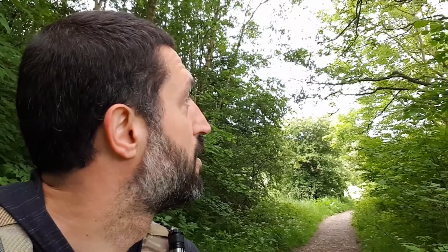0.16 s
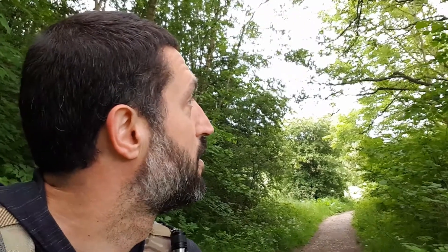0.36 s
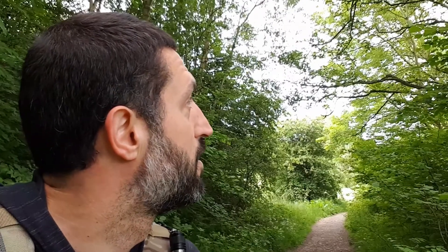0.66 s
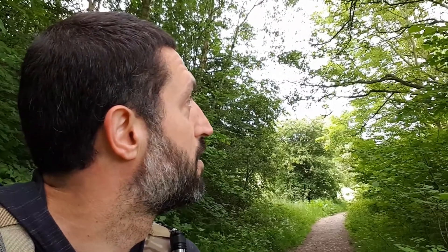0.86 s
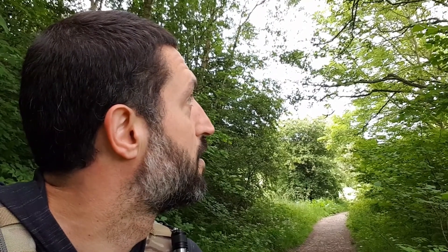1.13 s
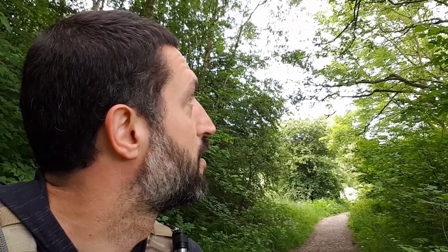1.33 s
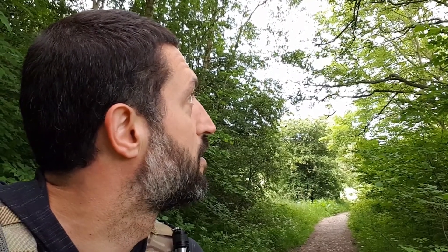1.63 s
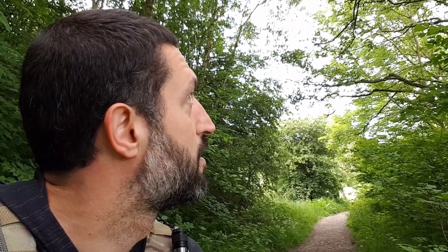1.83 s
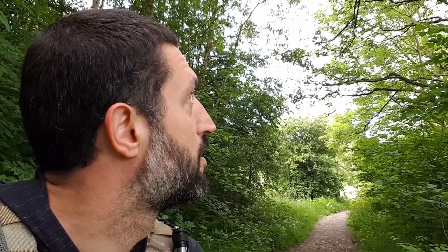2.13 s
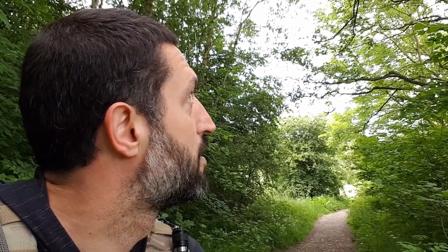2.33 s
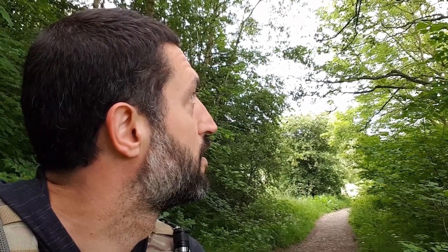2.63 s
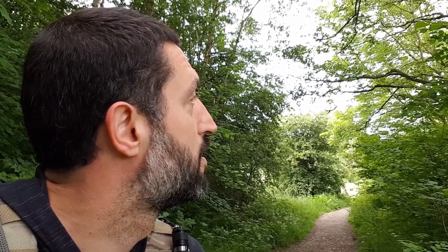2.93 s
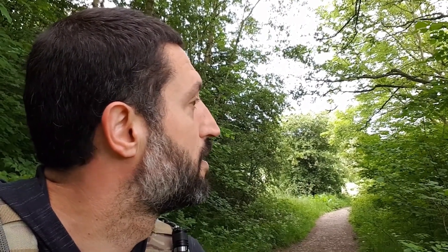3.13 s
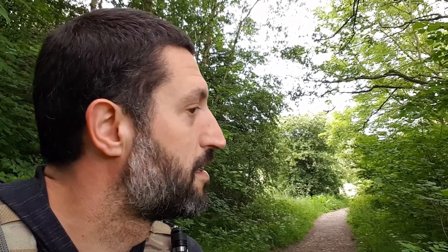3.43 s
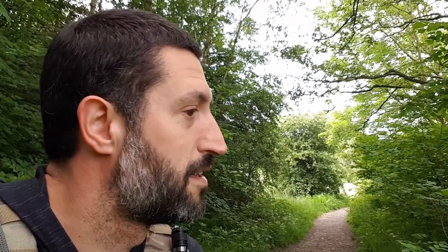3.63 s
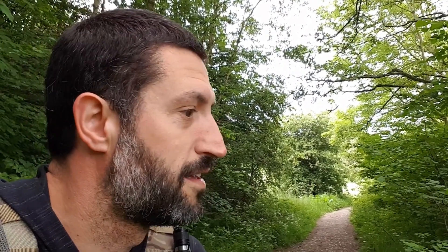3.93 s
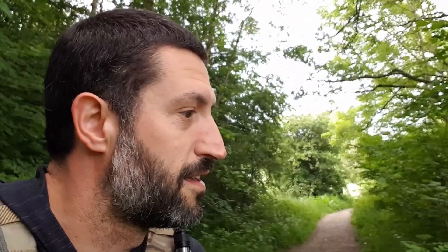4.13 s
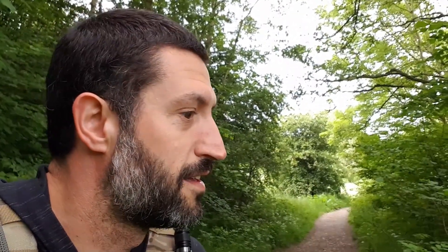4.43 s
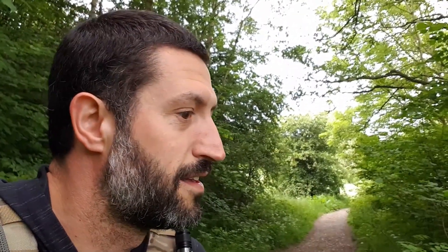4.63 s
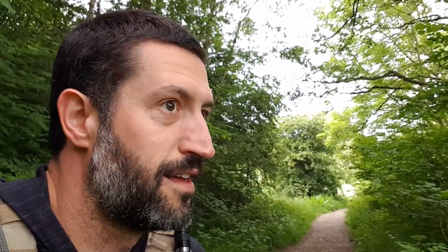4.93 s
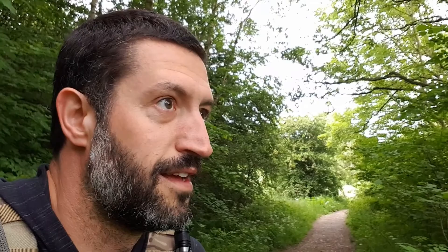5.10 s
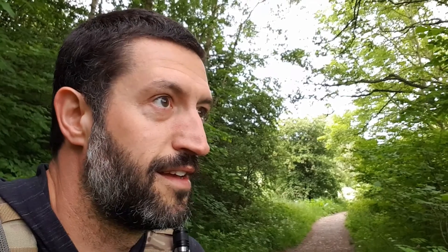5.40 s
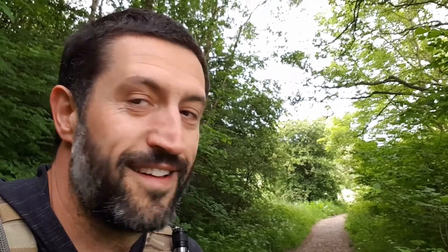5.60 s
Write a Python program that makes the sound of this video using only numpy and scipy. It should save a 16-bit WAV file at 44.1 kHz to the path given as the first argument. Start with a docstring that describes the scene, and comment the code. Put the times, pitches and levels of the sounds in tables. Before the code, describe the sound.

A lively woodland bird chorus fills about six seconds, already under way at the start. Short clear whistles and fast chirps overlap, and a mellow winding warble comes around 0.6 to 0.85 s. After a slightly sparser moment near 1 s, with faint ticks, sharp high chirps return at 1.25 to 1.5 s. From 2 to 2.9 s the singing is dense, with rapid up and down sweeps and a lower wavering whistle. Thin, slightly buzzy high notes twitter at about 3.2 to 3.5 s, followed by strong bright falling notes at 3.7 to 3.95 s. More quick chirps cluster around 4.5, 5.05 and 5.45 s, and thin high notes return near 5.6 s. Distant twitters and soft woodland echoes fill the gaps. A steady hiss of leaves and far traffic continues beneath, easing slightly at the end. The stereo is wide, with birds mostly left.

```python
"""Woodland birdsong over a far rush

Birds sing short whistles, fast sweeps and winding notes: sines on pitch curves, smeared by noise-tail echoes.
A bent waveform adds overtones. Far traffic and leaves are filtered noise; faint ticks and low blips lie on top.
Two microphones apart hear it: above the low bass the left one is earlier, and it gets the brighter sound.
"""
import sys
import numpy as np
from scipy import signal
from scipy.fft import rfft, irfft, next_fast_len
from scipy.io import wavfile
from scipy.ndimage import uniform_filter1d, map_coordinates

SR = 44100
rng = np.random.default_rng(int(sys.argv[2]) if len(sys.argv) > 2 else 0)


def to_wav(s):
    """Save 16-bit WAV."""
    ch = np.atleast_2d(s).T  # columns
    pcm = np.round(np.clip(ch, -1, 1) * 32767)  # PCM
    wavfile.write(sys.argv[1], SR, pcm.astype(np.int16))


N = 254016


def amp(db):
    """dB to linear gain."""
    return 10 ** (np.asarray(db) / 20)


def unit(x):
    """Scale to RMS 1."""
    return x / np.sqrt(np.mean(x ** 2) + 1e-20)


def along(points, hz):
    """Interpolate (f/Hz, value) points on a log frequency axis."""
    f, v = np.transpose(points)
    return np.interp(np.log(hz + 1), np.log(f + 1), v)


def wobble(rate_hz, size):
    """Smooth random curve, rate_hz knots a second."""
    knots = rng.standard_normal(int(size * rate_hz / SR) + 4)
    return map_coordinates(knots, [np.arange(size) * rate_hz / SR])


def filtered(x, response):
    """Multiply the spectrum of x by a complex response of frequency."""
    m = next_fast_len(N + SR // 2)
    return irfft(rfft(x, m) * response(np.fft.rfftfreq(m, 1 / SR)), m)[..., :N]


# Rush spectrum, relative density: f/Hz, level/dB
RUSH_SPECTRUM = [(15, -40.5), (30, -15), (55, 0.5), (100, -1), (220, -19.5), (400, -12.5), (630, -2),
                 (950, 0), (1400, 0), (2200, 0), (3400, -7.5), (7000, -11), (8500, -20.5), (12700, -13.5),
                 (15800, -32)]
# Rush level before RUSH_GAIN_DB: t/s, level/dB
RUSH_LEVEL = [(0.0, -50.5), (0.35, -50.5), (5.42, -50.5), (5.76, -52.5)]
# Likeness of the two microphones: f/Hz, correlation [-]
RUSH_LIKENESS = [(60, .85), (200, 0.547), (800, 0.633), (1500, 0.785), (2300, 0.688), (3500, 0.098),
                 (15000, 0.13)]
# Left-right balance: f/Hz, level difference/dB
RUSH_BALANCE = [(60, 4), (110, 2), (200, 3.0), (380, 7.5), (700, 5), (1290, -3), (2380, -1), (4400, 7),
                (8120, 8.5), (15000, 15.5)]
RUSH_GAIN_DB = 10.0


def rush(patchy_db):
    """Far traffic and leaves: noise with faint time-frequency patches, shared by the microphones per band."""
    z = signal.stft(rng.standard_normal((2, N + 512)), nperseg=512)[2]
    field = rng.standard_normal(z.shape[1:])
    field = uniform_filter1d(field, 6, axis=0)
    field = uniform_filter1d(field, 14, axis=1)
    pair = signal.istft(z * amp(patchy_db * unit(field)), nperseg=512)[1][:, :N]

    def mid_side(hz):
        turn = np.arccos(np.clip(along(RUSH_LIKENESS, hz), -1, 1)) / 2
        return amp(along(RUSH_SPECTRUM, hz)) * [np.cos(turn), np.sin(turn)]

    mid, side = filtered(pair, mid_side)
    both = np.array([mid + side, mid - side])
    both = filtered(both, lambda hz: amp(along(RUSH_BALANCE, hz) * [[.5], [-.5]]))
    t_s, db = np.transpose(RUSH_LEVEL)
    return amp(np.interp(np.arange(N) / SR, t_s, db) + RUSH_GAIN_DB) * unit(both)


WHISTLE_IN_DB, WHISTLE_ECHO_DB, WHISTLE_WAVER_PCT = -5, -2, 0.968  # start re peak, echo, base waver
DROP_DB, DROP_S, FADE_DB_PER_S = -6, 0.026, -93


def held(s, rise, length, first, top, last, db, lean, waver_pct):
    """A whistle rises to its peak, drops quickly while it fades, then only fades."""
    rest = max(length - rise, .004)
    after = np.array([0, min(DROP_S, rest / 2), rest])
    level = db + DROP_DB * np.minimum(after / DROP_S, 1) + FADE_DB_PER_S * after
    hz = top + (last - top) * after / rest
    rows = np.transpose([s + rise + after, hz, level])
    return lean, WHISTLE_ECHO_DB, waver_pct, [(s, first, db + WHISTLE_IN_DB), *rows]


# Held whistles: start t/s, rise/s, length/s, first f/Hz, peak f/Hz, last f/Hz,
# peak level/dB before mixing, direct left-right/dB
WHISTLE_NOTES = [(0, 0.0265, 0.056, 4910, 5040, 5390, -41.5, 9),
                 (0.094, 0.0127, 0.1, 4826, 5036, 4983, -32.5, 12.5),
                 (0.122, 0.0227, 0.107, 3867, 4245, 4195, -31, 11.5),
                 (0.288, 0.0533, 0.15, 5995, 6596, 6580, -34, 15.5),
                 (.32, 0.0284, 0.089, 4100, 4550, 4520, -41.5, 9),
                 (0.353, 0.0093, 0.046, 3336, 3290, 3320, -45.5, 7.5),
                 (0.569, 0.0095, 0.083, 4494, 4400, 4370, -43.5, 8),
                 (.76, 0.0337, 0.0405, 3340, 3242, 3170, -42, 3.5),
                 (0.888, 0.0249, 0.061, 2518, 2228, 2174, -37.5, -1.5),
                 (1.15, .03, 0.068, 4210, 4070, 4200, -61, 14),
                 (1.269, 0.0067, 0.05, 5850, 5710, 6005, -38.5, 18.5),
                 (1.284, 0.024, 0.07, 4430, 4422, 4400, -42, 8.5),
                 (1.378, 0.0326, 0.0285, 6047, 6190, 6450, -40.5, 14),
                 (1.39, .025, 0.0294, 4490, 4950, 5070, -45.5, 12.5),
                 (1.435, 0.0125, 0.05, 5137, 5212, 5460, -37, 13.5),
                 (1.71, 0.0335, 0.112, 4840, 4930, 4900, -36, 15.5),
                 (1.884, 0.0132, .065, 4736, 5013, 4930, -37.5, 13),
                 (1.881, 0.0254, 0.054, 3756, 3830, 3922, -39.5, 7),
                 (2.042, 0.0204, 0.0458, 5600, 5010, 4894, -31.5, 15),
                 (2.223, 0.042, 0.107, 7203, 6820, 6850, -42.5, 17.5),
                 (2.352, 0.023, 0.077, 6980, 7124, 7282, -38.5, 13),
                 (2.515, .04, 0.099, 4454, 4690, 4650, -48, 18),
                 (2.545, .008, 0.036, 5470, 5350, 5370, -40, 15.5),
                 (2.627, 0.0221, 0.067, 5620, 5347, 5340, -41.5, 18.5),
                 (2.771, 0.0294, 0.054, 4890, 4695, 4660, -48, 11.5),
                 (2.857, .035, 0.123, 2750, 3047, 3055, -40.5, 6),
                 (3.023, 0.0226, 0.073, 4560, 4670, 5010, -46, 13.5),
                 (3.31, 0.0197, 0.042, 3867, 3830, 3780, -49.5, 6),
                 (3.395, 0.0103, 0.0685, 5697, 5628, 5414, -32, 22.5),
                 (3.403, 0.0087, 0.048, 4300, 4452, 4615, -42.5, 6.5),
                 (3.515, 0.033, 0.133, 2408, 2365, 2490, -42, 0.5),
                 (3.534, 0.0183, 0.094, 4860, 5100, 5050, -43, 15),
                 (3.96, 0.0106, 0.138, 3768, 3843, 3800, -34.5, 4.5),
                 (4.355, 0.0393, 0.0766, 3340, 3050, 3410, -45, 10.5),
                 (4.465, 0.0115, 0.032, 5805, 5830, 5880, -40.5, 16.5),
                 (4.51, 0.022, 0.047, 6550, 6535, 6590, -44.5, 14.5),
                 (4.618, 0.04, 0.096, 2900, 3393, 2890, -46, 14),
                 (4.729, 0.0097, 0.043, 4322, 4320, 4325, -43.5, 4),
                 (4.812, 0.0366, .06, 3440, 3314, 2988, -48.5, 11.5),
                 (4.82, 0.0503, 0.08, 2210, 2068, 2166, -46, -8.5),
                 (4.95, 0.022, 0.042, 3430, 3500, 3470, -52, 4.5),
                 (5.015, 0.0212, 0.042, 4200, 4350, 4153, -39, 9.5),
                 (5.04, 0.0079, 0.049, 5027, 5044, 4910, -35.5, 17),
                 (5.063, 0.011, 0.065, 3540, 3600, 3647, -37.5, 7.5),
                 (5.318, 0.0144, 0.0356, 3604, 3560, 3558, -47, 5),
                 (5.4, 0.022, 0.03, 4825, 4920, 5050, -46.5, 13.5),
                 (5.478, 0.0172, 0.041, 4148, 4770, 4783, -36.5, 9),
                 (5.481, 0.0102, 0.063, 5140, 5764, 5895, -31, 19),
                 (5.723, 0.0178, 0.0375, 2565, 2682, 2687, -38, -2.5)]


def whistles():
    """Held whistles near by: rise, quick drop, slow fade."""
    return [held(*row, WHISTLE_WAVER_PCT) for row in WHISTLE_NOTES]


SWEEP_PEAK = 0.43  # share of length
SWEEP_IN_DB, SWEEP_OUT_DB, SWEEP_WAVER_PCT = -6.5, -5.5, 0.936  # edges re peak, base waver


def sweep(s, length, first, half, last, db, lean, echo_db):
    """A fast pitch glide, loudest near its middle."""
    at = np.array([0, SWEEP_PEAK, .5, 1])
    hz = np.interp(at, [0, .5, 1], [first, half, last])
    level = db + np.interp(at, [0, SWEEP_PEAK, 1], [SWEEP_IN_DB, 0, SWEEP_OUT_DB])
    return lean, echo_db, SWEEP_WAVER_PCT, np.transpose([s + at * length, hz, level])


# Fast sweeps: start t/s, length/s, first f/Hz, halfway f/Hz, last f/Hz,
# peak level/dB before mixing, direct left-right/dB, echo/dB
SWEEP_NOTES = [(0.02, 0.0232, 8000, 7096, 5710, -36.5, 16.5, 3),
               (.262, 0.0128, 5075, 7053, 6810, -36.5, 20.5, 3.5),
               (.868, 0.01516, 4282, 3064, 2516, -32.5, 3, -3),
               (1.248, 0.0335, 7760, 5906, 4113, -31.5, 17, 0.5),
               (2.0, 0.0248, 7403, 6610, 5490, -33, 21, 4), (2.035, 0.011, 4100, 5025, 5820, -33, 11.5, -2),
               (2.11, 0.0273, 4191, 3301, 2853, -30, 7, -0.5),
               (2.168, 0.0187, 2771, 3250, 3900, -29, 5, -2),
               (2.235, 0.032, 2790, 3250, 3010, -49.5, 10, -2),
               (2.402, 0.0308, 3010, 2600, 2298, -33.5, 2, 2),
               (2.438, 0.038, 2255, 2046, 1960, -40.5, 3, 2.5),
               (2.492, 0.049, 6300, 5690, 4600, -46.5, 12, 3.5),
               (2.639, 0.0597, 4120, 3695, 2812, -35.5, 12, 2),
               (2.665, 0.034, 4534, 4400, 4236, -41.5, 6.5, 0.5),
               (2.827, 0.0148, 2673, 2953, 3190, -34.5, 5, 1), (2.839, .025, 2990, 3490, 3890, -40, 7, 2),
               (3.387, 0.0159, 5700, 4984, 5814, -29.5, 16, -2),
               (3.486, 0.0246, 3014, 2592, 2386, -34, -0.5, 2.5),
               (4.449, 0.01755, 5094, 5825, 5827, -30, 18, 1),
               (4.471, .012, 5080, 5975, 6780, -36.5, 16, 2),
               (4.529, 0.0468, 5300, 4269, 3085, -36.5, 10, 2.5),
               (4.531, 0.0276, 2622, 3019, 2687, -43, 13.5, 1.5),
               (5.034, 0.03205, 5210, 3941, 2890, -33, 9, 0.5),
               (5.404, 0.0266, 7486, 6649, 6567, -31, 19.5, -0.5),
               (5.646, 0.0295, 7750, 6860, 6480, -38.5, 16, 1.5)]


def sweeps():
    """Fast near sweeps, each gliding through three pitches."""
    return [sweep(*row) for row in SWEEP_NOTES]


def far_notes(count):
    """A distant chorus of short random chirps, quiet and echo-heavy, each gliding to 0.7-1.1 of its pitch."""
    notes = []
    for start, octave, glide, stretch, loud, lean in rng.random((count, 6)):
        s = start * N / SR
        hz = 2300 * 2 ** (1.3 * octave)
        end_hz = hz * (.7 + .4 * glide)
        length_s = 0.0152 + 0.03001 * stretch
        db = -60.5 + 6 * loud
        notes.append((12 * lean, 3, 2.5, [(s, hz, db), (s + length_s, end_hz, db)]))
    return notes


# Soft low blips: centre t/s, f/Hz, peak level/dB before panning
BLIP_NOTES = [(.4, 537.3, -43), (.53, 527.4, -46.5), (2.19, 1349, -42), (2.57, 783, -41.5),
              (3.97, 502.2, -47.5)]


def blips():
    """Soft low blips: sines under a 50 ms Hann window."""
    out, t = np.zeros(N + SR), np.arange(SR // 20) / SR
    for s, hz, db in BLIP_NOTES:
        start = round((s - .025) * SR)
        out[start:start + len(t)] += amp(db) * np.hanning(len(t)) * np.sin(2 * np.pi * hz * t)
    return out[:N]


PHRASE_ECHO_DB, PHRASE_WAVER_PCT = -1.5, 0.96
# Winding notes: direct left-right/dB, [(t/s, f/Hz, level/dB before mixing), ..]
PHRASE_NOTES = [(4.1, [(.585, 3061, -40.5), (.61, 3143, -33.5), (.65, 3004, -36.5), (.7, 2818, -31),
                (.74, 2848, -35.5), (.79, 2923, -40), (.85, 2860, -48.5)]), (17, [(1.5, 7920, -42.5),
                (1.512, 6995, -31), (1.528, 5670, -37.5), (1.538, 5900, -39.5), (1.553, 6447, -39.5),
                (1.58, 6530, -45), (1.65, 6675, -49)]), (10.4, [(1.7, 3490, -51), (1.73, 3871, -36.5),
                (1.77, 3808, -35), (1.81, 3755, -35.5), (1.86, 3770, -54.5)]), (6.7, [(2.25, 4245, -36.5),
                (2.28, 3931, -38), (2.32, 3764, -29), (2.35, 3853, -32), (2.4, 3774, -42),
                (2.45, 3854, -42.5), (2.51, 3757, -56)]), (15, [(3.015, 6700, -41), (3.035, 7700, -36),
                (3.05, 7016, -33), (3.062, 5782, -34.5), (3.085, 5633, -37.5), (3.11, 5234, -41.5)]),
                (15.7, [(3.66, 5664, -35.5), (3.672, 6203, -31.5), (3.69, 5568, -30), (3.71, 5123, -31.5),
                (3.735, 4633, -37.5), (3.77, 4368, -39.5), (3.81, 4463, -31.5), (3.85, 4522, -39),
                (3.89, 4516, -51.5)]), (10.1, [(3.9, 3820, -40), (3.93, 3833, -26), (3.945, 3685, -30.5),
                (3.968, 2926, -34)])]


def phrases():
    """Long winding near notes along drawn pitch and level curves."""
    return [(lean, PHRASE_ECHO_DB, PHRASE_WAVER_PCT, rows) for lean, rows in PHRASE_NOTES]


# Faint close ticks: t/s, nominal level/dB before trim and panning
TICK_TIMES = [(0.9795, -42), (1.0194, -34), (1.882, -30), (4.477, -38), (5.007, -38)]


def ticks():
    """Dry close ticks: treble-tilted noise bursts, decaying 60 dB in 15.2 ms."""
    out, t = np.zeros(N + SR), np.arange(SR // 20) / SR
    for s, db in TICK_TIMES:
        start = round(s * SR)
        noise = np.diff(rng.standard_normal(len(t) + 1))
        out[start:start + len(t)] += amp(db - 5 - 60 * t / 0.0152) * noise
    return out[:N]


HIGH_WAVER_PCT = 1.86
# Thin high notes: start t/s, rise/s, length/s, first f/Hz, peak f/Hz, last f/Hz,
# peak level/dB before mixing, direct left-right/dB
HIGH_NOTES = [(3.16, 0.056, 0.123, 8097, 7817, 7740, -39, 2.7),
              (3.225, 0.0216, .055, 8850, 9000, 8800, -44.5, 7.4),
              (3.265, 0.017, 0.052, 7500, 7245, 7400, -38.5, 8.2),
              (3.3, 0.0293, .06, 7564, 7693, 7680, -40, 5.5),
              (3.36, 0.0274, 0.062, 7680, 7400, 7524, -40, 5.9),
              (3.421, 0.0215, 0.0515, 7700, 7570, 7340, -48, 6),
              (3.46, 0.029, 0.082, 7030, 6750, 6926, -44, 11),
              (5.585, 0.0264, 0.064, 8564, 8107, 8290, -39, 5.9),
              (5.64, 0.0208, 0.042, 7750, 7700, 7640, -42.5, 7.6)]


def high_notes():
    """A second bird's thin notes: whistle-shaped, buzzy from a wider pitch waver."""
    return [held(*row, HIGH_WAVER_PCT) for row in HIGH_NOTES]


def sing(rows, flutter_db, waver):
    """A sine on (t/s, f/Hz, level/dB) rows; level flutters, pitch wavers most where it sweeps fast."""
    s, hz, db = np.transpose(rows)
    t = np.arange(round((s[-1] - s[0]) * SR)) / SR
    pitch = uniform_filter1d(np.interp(t + s[0], s, hz), size=120)
    speed = np.minimum(np.abs(np.gradient(np.log(pitch))) * SR / 12, 2.5)
    pitch = pitch * (1 + waver * (1 + speed) * wobble(703.2, len(t)))
    edges = np.clip(t / 0.00059, 0, 1) * np.clip((t[-1] - t) / 0.00129, 0, 1)
    flutter = wobble(66.85, len(t)) + 1.516 * wobble(301.55, len(t))
    level_db = np.interp(t + s[0], s, db) + flutter_db * flutter
    return np.sqrt(2) * edges * amp(level_db) * np.sin(2 * np.pi * np.cumsum(pitch) / SR)


# Echo decay among the trees: f/Hz, t60/s
WOOD_DECAY = [(1500, 0.657), (4000, 0.494), (8000, 0.49), (13000, 0.14)]


def echoes():
    """Fresh clumpy stereo noise tail for scattering from trunks and leaves, mean energy 1 a side."""
    hz, t, z = signal.stft(rng.standard_normal((2, SR // 2)), SR, nperseg=128)
    onset = 1 - np.exp(-t / 0.00211) + 0.542 * np.exp(-t / 0.0121)  # nearby branches answer first and strongest
    decay = amp(-60 * t / along(WOOD_DECAY, hz)[:, None])
    tail = signal.istft(z * onset * decay, SR, nperseg=128)[1]
    tail = tail * amp(1.4 * wobble(57.9, tail.shape[1]))
    return unit(tail) / np.sqrt(tail.shape[1])


# Waveform bend before colouring: power [-], level/dB
BEND = [(2, -16.5), (3, -20.5)]
# Overtone colour: f/Hz, gain/dB
OVERTONE_COLOUR = [(6000, -52.5), (8500, -9.5), (10500, -2), (12600, 11.5), (15000, -8)]


def overtones(notes):
    """A bent waveform adds harmonics, and sum tones where two whistles sound together."""
    size = np.sqrt(np.abs(uniform_filter1d(notes ** 2, size=300, axis=1))) + amp(-48)
    bent = sum(amp(db) * size * (notes / size) ** power for power, db in BEND)
    return filtered(bent, lambda hz: amp(along(OVERTONE_COLOUR, hz)))


def birds():
    """Each note arrives directly and again through its own echoes; overtones are added to the sum."""
    notes = phrases() + sweeps() + whistles() + high_notes() + far_notes(count=90)
    out = np.zeros((2, N + 2 * SR))
    for lean_db, echo_db, waver_pct, rows in notes:
        note = sing(rows, flutter_db=1.6, waver=waver_pct / 100)
        sides = unit(amp([[lean_db / 2], [-lean_db / 2]]))
        # sqrt: echoes lean half as far in dB
        wet = amp(echo_db) * np.sqrt(sides) * signal.fftconvolve(note[None], echoes(), axes=1)
        wet = wet * unit(amp(1.43 * wobble(200.0, wet.shape[1])))  # stirring leaves break the echoes up
        start = round(rows[0][0] * SR)
        out[:, start:start + len(note)] += amp(-3.0) * sides * note
        out[:, start:start + wet.shape[1]] += wet
    out = out[:, :N]
    return out + overtones(out)


# Phase lead of the left microphone: f/Hz, phase/rad
LEFT_LEAD = [(0, 0), (170, -0.0632), (860, 1.5), (1550, 4), (2240, 6.5), (16000, 41)]


def scene():
    """Sum all layers, then split the phase lead so sound above the low bass reaches the left first."""
    small_sounds = (ticks() + blips()) * amp([[2.5], [-5]])

    def lead(hz):
        phase = np.interp(hz, *np.transpose(LEFT_LEAD))
        return np.exp(1j * phase * np.array([[.5], [-.5]]))

    return filtered(birds() + small_sounds + rush(patchy_db=1.7942), lead)


TOP_HZ = 15880


def record(dry):
    """Brick-wall band limit: nothing is kept from TOP_HZ up."""
    return filtered(dry, lambda hz: hz < TOP_HZ)


dry = scene()
out = record(dry)
to_wav(out)
```